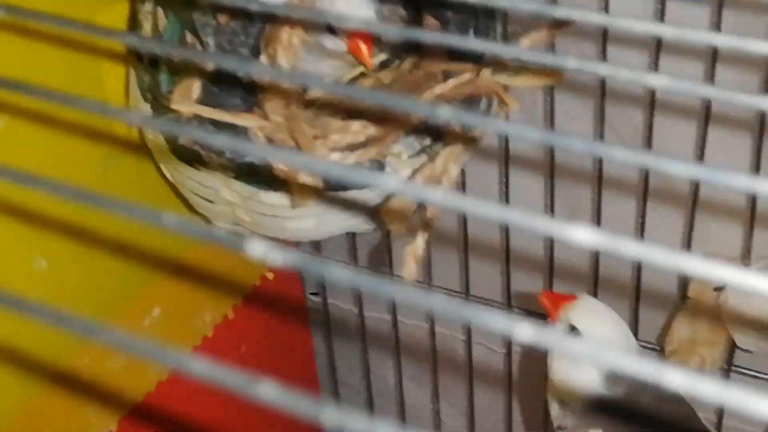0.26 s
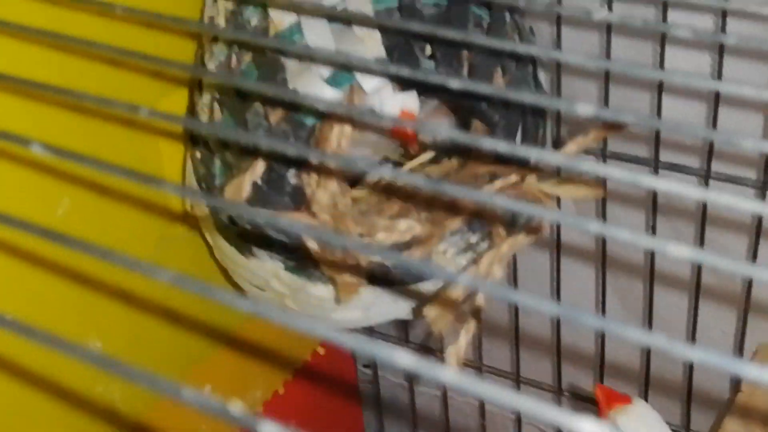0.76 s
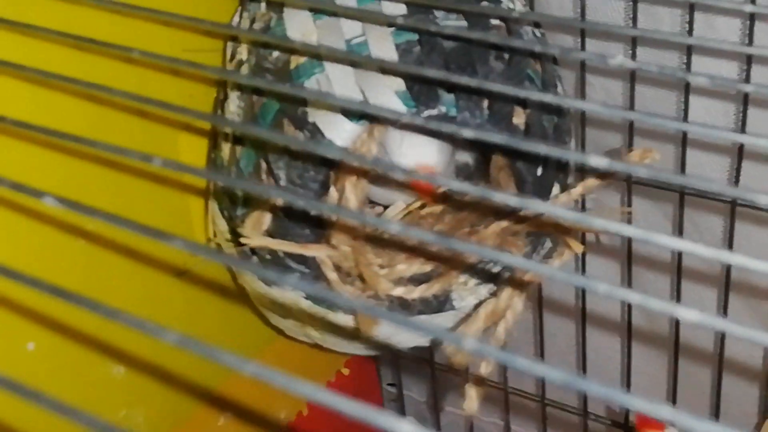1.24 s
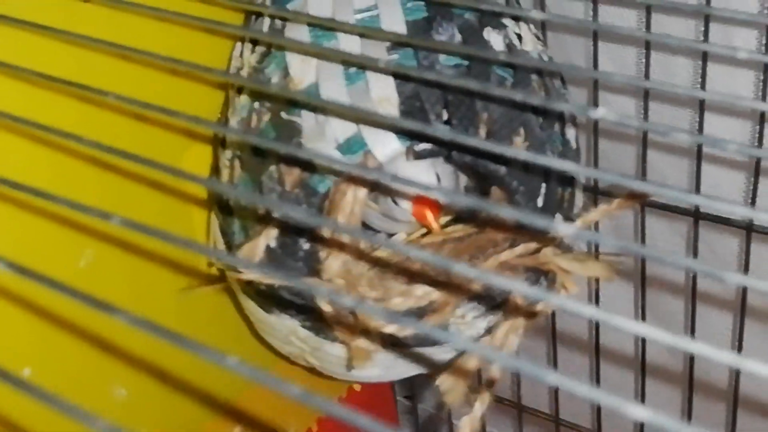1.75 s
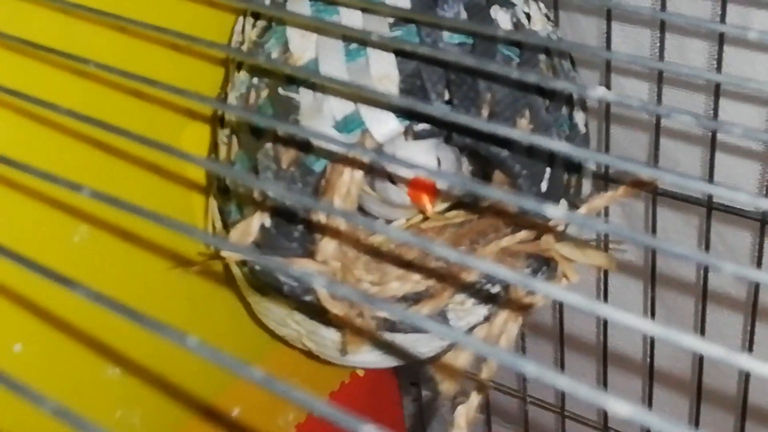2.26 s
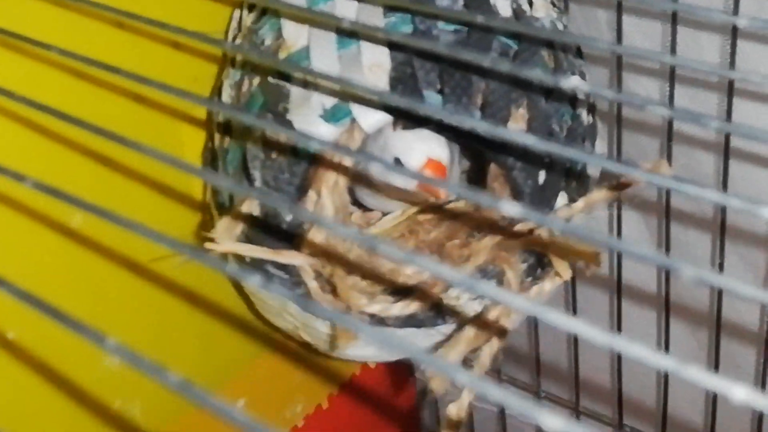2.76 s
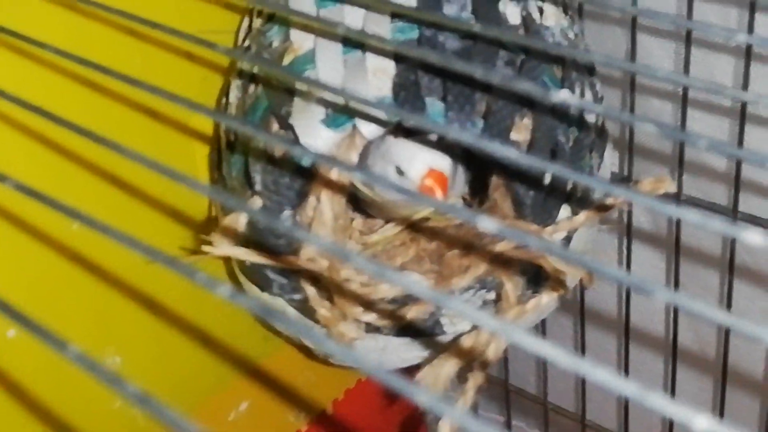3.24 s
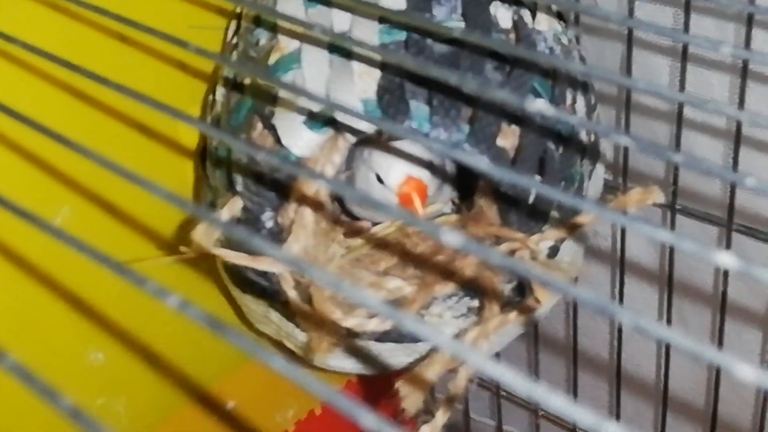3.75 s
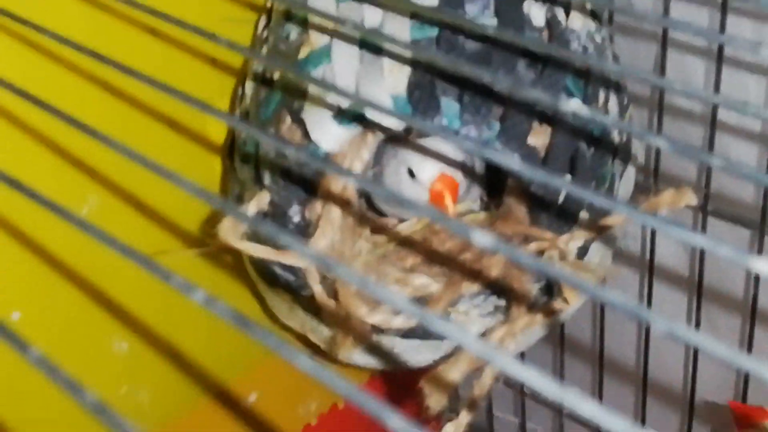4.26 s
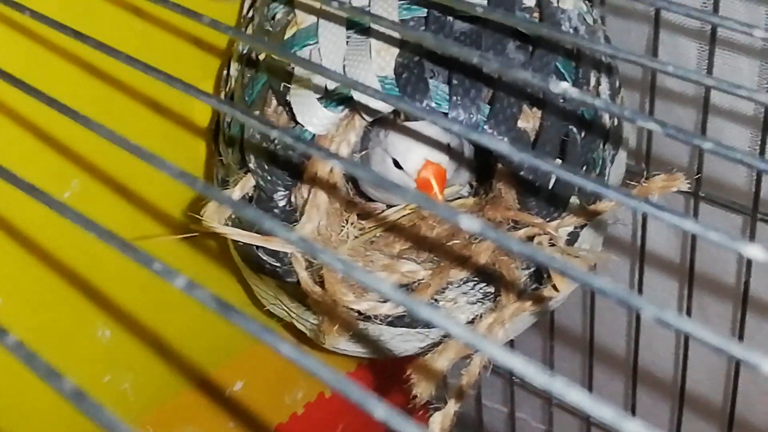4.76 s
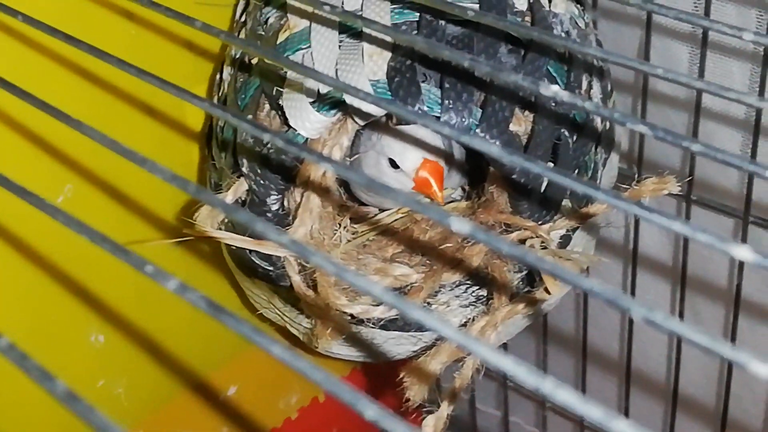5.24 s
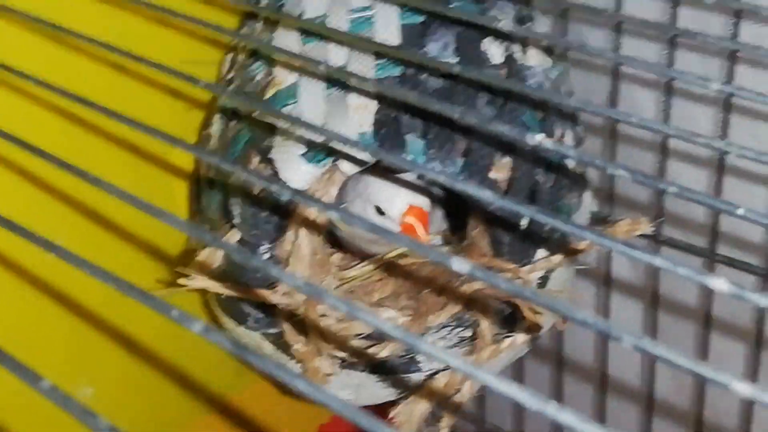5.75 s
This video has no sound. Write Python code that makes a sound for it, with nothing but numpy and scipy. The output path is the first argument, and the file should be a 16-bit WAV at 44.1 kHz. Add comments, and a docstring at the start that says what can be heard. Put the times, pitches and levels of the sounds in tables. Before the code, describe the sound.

A small finch sings close by in a wire cage in a small room, slightly to the right. It repeats a quick phrase of ticks, squeaks, thin whistles and nasal buzzes about four times. It pauses, gives one soft call and two louder ones, then starts again with three short notes. The song breaks off in a brief flutter of wings. Straw rustles faintly over a low room rumble.

```python
"""A zebra finch sings close by in a wire cage in a small room, running through one motif of ticks, whistles and
buzzy stacks. It pauses, calls twice, starts again with three introductory notes and breaks off in a flutter of
wings. Nest straw rustles faintly over a low rumble."""
import sys
import numpy as np
from scipy import signal
from scipy.fft import rfft, irfft, next_fast_len
from scipy.io import wavfile

SR = 44100
rng = np.random.default_rng(int(sys.argv[2]) if len(sys.argv) > 2 else 0)


def unload_wav(signal):
    """Save mono or channel-first audio to the path in sys.argv[1] as 16-bit WAV at rate SR, clipped to [-1, 1]."""
    wavfile.write(
        sys.argv[1],
        SR,
        np.round(np.clip(np.atleast_2d(signal).T, -1, 1) * 32767).astype(np.int16),
    )


N = 264600

# Voice of each syllable: (throat half-width Hz, overtones leaking past the throat dB, upper resonance Hz, upper resonance dB)
VOICES = {"tuck": (902, -17, 8500, -24.5), "squeak": (722.5, -34.5, 7899.5, -18), "chack": (799, -25.5, 10402, -10.5), "chuck": (902, -15, 7493.5, -18.5),
          "tick": (1199, -20.5, 9494, -35), "scratch": (1251, -20, 7499, -6.5), "tee": (1192, -28, 8998.5, -18.5), "nasal": (878.5, -22, 9901.5, -16.5),
          "slide": (950, -18, 9902, -35.5), "yah": (999, -23.5, 9899.5, -14.5), "pip": (1299, -34, 9000.5, -26.5), "chip": (1198.5, -27.5, 9002.5, -32.5),
          "rasp": (1049, -14.5, 7401, -4), "whistle": (1699.5, -23.5, 14099, -9.5), "tew": (900, -18, 10198.5, -15), "call": (796, -23, 8600, -5),
          "soft call": (500, 0.5, 7501, 6), "tut": (898, -21, 5995.5, -39), "intro": (747, -28, 9303, -26.5)}
# When each phrase is sung: (s, dB, sharp or flat %)
SONG = {
    "clatter": [(.516, -1.16, .2), (1.363, -1.5, .2), (2.220, -0.9, .2), (5.501, -0.5, .2)],
    "chuck-tee": [(-.125, 13.5, 0.58), (.723, 0.1, 0.42), (1.575, 1.14, 0.13), (2.434, -0.3, .2), (4.8635, 1, 0.52), (5.714, 0.5, 0.42)],
    "buzz": [(.056, 4, 0.87), (.896, 3.3, -0.51), (1.752, 2.9, -0.63), (2.614, 3.5, .1), (5.035, 3.5, 0.27)],
    "run": [(.226, -0.9, .3), (1.069, -.5, -.3), (1.925, -1, .2), (2.787, -0.9, .2), (5.208, 0.3, .5)],
    "ending": [(.409, -1, .3), (1.252, -0.7, -.3), (2.108, -0.4, -.3), (2.974, -0.85, .2), (5.391, 0, .3)],
    "call": [(4.141, -1, .5), (4.243, -0.7, -0.64)],
    "soft call": [(3.335, 0.5, 0.0038)],
    "introduction": [(4.373, -1.1, 2), (4.542, .3, 0.14), (4.708, -0.3, 0.13)],
}
# Rustles of straw and feathers: (s, length s, dB)
RUSTLES = [(1.31, 0.34, -39), (2.80, 0.12, -40), (3.965, 0.081, -51), (5.893, 0.042, -31), (5.93, 0.23, -22.5)]
RUSTLE = [(400, -22.5), (2000, -13), (2500, -1), (9500, -6.5), (12800, -17.5), (15500, -28)]   # (Hz, dB per Hz)
# Soft low thumps as the birds move: (s, length s, dB)
THUMPS = [(1.31, .3, -51.5), (1.77, .08, -57), (2.815, 0.083, -47.5), (5.898, 0.05, -40), (5.948, 0.031, -40)]
THUMP = [(40, -8.5), (120, -7), (330, -2.5), (600, -31), (1200, -7)]   # (Hz, dB per Hz)
# Background: (s, rumble dB, shuffling dB)
BACKGROUND = [(0, -49.5, -48), (.9, -56.5, -61), (1.7, -55.5, -63), (2.1, -61, -71.5), (4.6, -61.5, -72.5), (6, -64, -72.5)]
RUMBLE = [(20, -8), (55, 4), (80, -2.5), (108, 2.5), (160, -8.5), (300, -34)]   # (Hz, dB per Hz)
SHUFFLE = [(100, -22), (180, -5), (260, 0.5), (500, -14.5), (800, -8), (2000, -10.5)]   # (Hz, dB per Hz)
# The two microphone ports: (Hz, left minus right dB) and (Hz, radians by which left leads)
PORT_BALANCE = [(500, 9.5), (2000, 1.5), (2800, 1.5), (3500, -4.5), (4700, -9), (6500, -6.5), (8400, 3.5), (10800, 20.5), (15000, 0.5)]
PORT_PHASE = [(300, 2.5), (2800, 0.54), (3700, 1.43), (4300, 3.2), (5200, 1.89), (6500, 1.2), (9000, 1.5), (15000, -0.72)]
ROOM_T60 = [(500, 0.35), (3000, 0.26), (7000, 0.2), (14000, 0.42)]   # (Hz, s)
CUTOFF_HZ = 15750   # fixed
# Phrases, always sung the same way: (syllable, delay s, dB)
PHRASES = {
    "clatter": [("tuck", .001, 0), ("squeak", .061, 0), ("chack", 0.081, 0)],
    "chuck-tee": [("chuck", 0.0069, 0), ("tick", .072, 0), ("scratch", .089, 0), ("tee", 0.1, 0)],
    "buzz": [("nasal", 0.006, 0), ("slide", .086, 0), ("yah", .120, 0)],
    "run": [("pip", .0035, 0), ("chip", .034, 0), ("rasp", 0.068, 0), ("whistle", .109, 0), ("tick", .140, -11)],
    "ending": [("tick", 0, -0.67), ("tew", 0.022, 0)],
    "call": [("call", 0, 0)],
    "soft call": [("soft call", 0, 0)],
    "introduction": [("tut", 0.0034, 0), ("intro", .039, 0)],
}
HISS = [(500, -6), (1200, 0), (2100, -5), (4000, -3), (9000, -4), (11500, -12.5), (15500, -19.5)]   # (Hz, dB per Hz)
HISS_DB = -67
# The hand-held recorder turns: (s, left minus right dB)
AIM = [(0, -3.5), (2.5, -4.5), (6, -6)]
# Radiation from the small beak, weak in the bass and the far treble: (Hz, dB)
BEAK = [(520, -18.5), (800, 2.5), (1250, 3.5), (2100, 4), (3500, 1), (7500, -2), (10200, -3.5), (11500, -15.5), (13000, -21.5), (15500, -31)]
# The notes that make up each syllable:
# (start ms, length ms, level dB, swell over the note dB, first pitch Hz, last pitch Hz, throat resonance Hz, roughness 0-1)
SYLLABLES = {
    "tuck": [(0.0019, 32, -25, 0.5, 1300, 430, 4000, 0.4)],
    "squeak": [(0, 20, -11.5, 6.5, 1910, 1985, 4100, 0.3), (16, 9, -11, 1.5, 6100, 4800, 4900, .2), (24, 8, -17, -5, 3800, 3000, 4200, .4)],
    "chack": [(0.00052, 82, -17, -1.5, 1200, 560, 4230, 0.5)],
    "chuck": [(0, 52, -25.5, -5.5, 830, 380, 4290, 0.1)],
    "tick": [(0, 6, -7.5, -0.5, 4680, 4555, 4700, 0.06), (5.5, 9.2, -22, -6.5, 4676, 2543, 3400, 0.4)],
    "scratch": [(0.0036, 29, -23, 8.5, 1100, 1400, 5900, 0.82)],
    "tee": [(0, 27.96, -16, -2.5, 1442, 1424, 4120, 0.24)],
    "nasal": [(0, 82, -25, 0.5, 522, 574, 3900, 0.27)],
    "slide": [(0, 41, -30, 3.5, 1700, 840, 3320, 0.7)],
    "yah": [(0, 34.1, -21, 6, 718, 710, 3960, 0.24), (33.3, 13, -32, -5.5, 700, 580, 3600, .35)],
    "pip": [(0, 7.1, -13, -3, 5640, 6560, 7000, 0.2)],
    "chip": [(0, 6, -11, -4, 4410, 4315, 4360, 0.1), (5, 9, -19, -9, 4580, 2617, 3400, .3)],
    "rasp": [(0.0015, 35, -27.5, -7, 850, 290, 4950, 0.5)],
    "whistle": [(0.0018, 18.7, -9.5, 5, 6280, 7420, 8200, 0.05)],
    "tew": [(0, 27.4, -14.5, -0.5, 1392, 1350, 4930, 0.15), (19, 31, -37, -4, 1800, 870, 3800, 1)],
    "call": [(0, 59, -19, -6, 900, 500, 3730, .62)],
    "soft call": [(0, 57, -40.5, 14, 2600, 370, 4200, 0.5)],
    "tut": [(0.012, 25, -33, -6, 1050, 480, 2380, 0.62)],
    "intro": [(0, 27, -11.5, -10, 1830, 1785, 4030, 0.16), (26.9, 52, -28, -2.5, 1250, 540, 3520, 0.5)],
}
UPPER_WIDTH_HZ = 1600   # half-width of the upper resonance
# Every note opens and closes in the same way; longer notes do so more slowly
ATTACK_MS, RELEASE_MS, TYPICAL_NOTE_MS, SLOWER_WITH_LENGTH = 7.35, 7.68, 21.35, .65
PITCH_SAG = 0.018   # share by which pitch drops as the air pressure fades
# Share of the glide that the throat resonance follows
THROAT_FOLLOWS = .15   # fixed
ONSET_ROUGHNESS = 0.27   # extra roughness until the syrinx has settled
SOFT_START = 0.97   # curvature of the attack
GLIDE_MS = 27   # time constant: a glide starts fast and flattens out
ONSET_LIFT = None
ONSET_LIFT_MS = None
OPEN_BEAK_HZ, OPEN_BEAK_PULL, OPEN_BEAK_MS = 6900, 0.48, 4.46   # each note starts with the beak open, which pulls the throat resonance up by this share of the way


def from_db(db):
    """Decibels to gain."""
    return 10 ** (np.asarray(db) / 20)


def rms_one(x):
    """Scale to rms 1."""
    return x / np.sqrt(np.mean(x ** 2) + 1e-20)


def at_hz(points, hz):
    """Read a table on a log-frequency axis."""
    f, value = np.transpose(points)
    return np.interp(np.log(hz + 1), np.log(f + 1), value)


def filtered(x, response):
    """Pass x through a frequency response, with a second of room for its tail."""
    size = next_fast_len(N + SR)
    return irfft(rfft(x, size) * response(np.arange(size // 2 + 1) * SR / size), size)[..., :N]


def add(track, s, sound):
    """Mix a sound into a track at time s."""
    at = round(s * SR) + np.arange(len(sound))
    inside = (at >= 0) & (at < N)
    track[at[inside]] += sound[inside]


def flutter(size, rate_hz, channels=1):
    """Random wavering up to a given rate; spread 1."""
    white = rng.standard_normal((channels, size + SR // 50))
    return rms_one(signal.sosfilt(signal.butter(2, rate_hz, fs=SR, output="sos"), white)[:, -size:]).squeeze()


def noise(spectrum, width):
    """Coloured stereo noise of rms 1, falling away above its table; width is side over mid."""
    top_hz = spectrum[-1][0]
    colour = lambda hz: from_db(at_hz(spectrum, hz)) * (top_hz / np.maximum(hz, top_hz)) ** 2
    mid, side = filtered(rng.standard_normal((2, N)), colour)
    return rms_one(mid + width * side * np.array([[1], [-1]]))


def swells(rows):
    """Each row rises and falls once."""
    out = np.zeros(N)
    for s, length, db in rows:
        add(out, s, from_db(db) * np.sin(np.linspace(0, np.pi, int(abs(length) * SR) + 2)))
    return out




def finch():
    """Phrases are strings of syllables and syllables of notes, sung each time with small changes."""
    out = np.zeros(N)
    for phrase, rows in SONG.items():
        for s, db, sharp_percent in rows:
            for name, delay, accent_db in PHRASES[phrase]:
                for start_ms, *shape in SYLLABLES[name]:
                    onset = s + delay + start_ms / 1000   # fixed
                    add(out, onset, from_db(db + accent_db) * note(gesture(*shape), sharp_percent, *VOICES[name]))
    return out


def ports(x):
    """The recorder's body shades and delays the two ports differently at each pitch."""
    def response(hz):
        ratio = from_db(at_hz(PORT_BALANCE, hz))
        return np.array([ratio * np.exp(1j * at_hz(PORT_PHASE, hz)), np.ones(len(hz))]) * np.sqrt(2 / (1 + ratio ** 2))
    return filtered(x, response)


def cage(x, echo_db=-15, count=8):
    """Quick reflections from the tray and the walls around the cage."""
    out = np.zeros((2, N))
    for side in out:
        for delay in rng.uniform(0.00067, .009, count):
            add(side, delay, x * rng.choice([-1, 1]) * from_db(echo_db) / np.sqrt(count))
    return out


def room(x, room_db=-15, first_echo_s=0.0052):
    """A diffuse tail that dies sooner in the treble."""
    t = np.arange(SR * 3 // 4) / SR
    edges, tail = np.geomspace(600, 10500, 8), 0   # fixed
    for low, high in zip(edges, edges[1:]):
        band = signal.sosfilt(signal.butter(2, [low, high], "band", fs=SR, output="sos"), rng.standard_normal((2, len(t))))
        tail = tail + band * from_db(-60 * t / at_hz(ROOM_T60, np.sqrt(low * high)))   # fixed
    tail = tail * (t > first_echo_s)
    return from_db(room_db) * signal.fftconvolve(x[None], tail / np.sqrt((tail ** 2).sum() / 2), axes=1)[:, :N]


def movements(grain_db=1.0):
    """Straw and feathers brush in grainy swells; hops and wing beats thump softly."""
    brush = swells(RUSTLES) * noise(RUSTLE, width=1.0) * from_db(grain_db * flutter(N, rate_hz=300))
    return brush + swells(THUMPS) * noise(THUMP, width=.25)


def background():
    """A low rumble, faint shuffling and an even hiss."""
    s, *columns = np.transpose(BACKGROUND)
    rumble_db, shuffle_db = [np.interp(np.arange(N) / SR, s, c) for c in columns]
    rumble = from_db(rumble_db) * noise(RUMBLE, width=.1)
    shuffle = from_db(shuffle_db + 1.6 * flutter(N, rate_hz=6.5)) * noise(SHUFFLE, width=0.44)
    return rumble + shuffle + from_db(HISS_DB) * noise(HISS, width=1.0)


def nest(x, smear_s=0.0013, count=60):
    """The wicker nest holds each pitch back by a different instant, which smears the pulses."""
    def response(hz):
        delay = np.interp(hz, np.linspace(0, CUTOFF_HZ, count), smear_s * rng.uniform(0, 2, count))
        return np.exp(-2j * np.pi * np.cumsum(delay) * hz[1])
    return filtered(x, response)


def gesture(length_ms, db, swell_db, first_hz, last_hz, throat_hz, roughness):
    """Air pressure rises, holds and falls while the pitch glides and the throat follows: pitch, gain, throat, roughness."""
    ms = np.arange(0, length_ms, 1000 / SR)   # fixed
    slowness = (length_ms / TYPICAL_NOTE_MS) ** SLOWER_WITH_LENGTH
    opening = np.sin(np.pi / 2 * np.minimum(ms / (ATTACK_MS * slowness), 1)) ** SOFT_START
    closing = np.sin(np.pi / 2 * np.minimum((length_ms - ms) / (RELEASE_MS * slowness), 1)) ** 2
    pressure = opening * closing
    glide = first_hz * (last_hz / first_hz) ** (np.expm1(-ms / GLIDE_MS) / np.expm1(-length_ms / GLIDE_MS))
    pitch = glide * (1 - PITCH_SAG * (1 - pressure))
    throat = throat_hz * (glide / glide.mean()) ** THROAT_FOLLOWS
    throat = throat + (OPEN_BEAK_HZ - throat) * OPEN_BEAK_PULL * np.exp(-ms / (OPEN_BEAK_MS * slowness))
    rough = np.clip(roughness + ONSET_ROUGHNESS * (1 - opening), 0, 1)
    return pitch, pressure * from_db(db + swell_db * (ms / length_ms - .5)), throat, rough


def note(controls, sharp_percent, width_hz, leak_db, upper_hz, upper_db, jitter_s=3.5e-5, shimmer=0.12, alternation=0.29, chaos=0.77, sizzle_db=10, uneven_db=2.5, detune=.002, throat_spread=0.049):
    """The syrinx makes a stack of harmonics; the throat picks out those near its moving resonance and a weaker, higher one."""
    pitch, gain, throat, rough = controls
    pitch = pitch * (1 + sharp_percent / 100)   # fixed
    pitch = pitch * (1 + detune * rng.standard_normal())
    throat = throat * (1 + throat_spread * rng.standard_normal())
    # in rough stretches the pulses come unevenly in time and strength, and alternate strong and weak
    phase = 2 * np.pi * (np.cumsum(pitch) / SR + pitch * jitter_s * rough * flutter(len(pitch), rate_hz=470))
    strength = np.exp(shimmer * rough * flutter(len(pitch), rate_hz=550)) * (1 + alternation * rough * np.cos(phase / 2))
    k = np.arange(1, CUTOFF_HZ // pitch.min() + 1)[:, None]
    hz = k * pitch
    off = (hz - throat) / width_hz
    resonance = 1 / ((1 + 1j * off) * (1 + 1j * off - off ** 2))
    upper = from_db(upper_db) / (1 + ((hz - upper_hz) / UPPER_WIDTH_HZ) ** 2)
    # harsh stretches are brighter, and their harmonics fall out of step into a rasp
    leak = from_db(leak_db + sizzle_db * rough * hz / 20800.0)
    scatter = chaos * rough * flutter(len(pitch), rate_hz=220, channels=len(k))
    uneven = from_db(uneven_db * rng.standard_normal(k.shape))   # no two renditions weight their harmonics alike
    partials = np.hypot(abs(resonance), np.hypot(upper, leak)) * uneven * from_db(at_hz(BEAK, hz)) * (hz < CUTOFF_HZ)
    partials = partials / np.sqrt((partials ** 2).sum(axis=0) / 2)
    wave = (partials * np.cos(k * phase + np.angle(resonance) + scatter)).sum(axis=0)
    return wave * strength * gain


def scene():
    """The bird sits near and to the right; its echoes come from all round."""
    song = nest(finch())
    aim_db = np.interp(np.arange(N) / SR, *np.transpose(AIM))
    direct = ports(song) * from_db(np.array([aim_db, 0 * aim_db]))
    echoes = (cage(song) + room(song)) * from_db([[-2], [1]])
    return direct + echoes + movements() + background()


def record(dry):
    """The top is cut steeply."""
    return signal.sosfilt(signal.ellip(10, .1, 90, CUTOFF_HZ, fs=SR, output="sos"), dry)


dry = scene()
out = record(dry)
unload_wav(out)
```